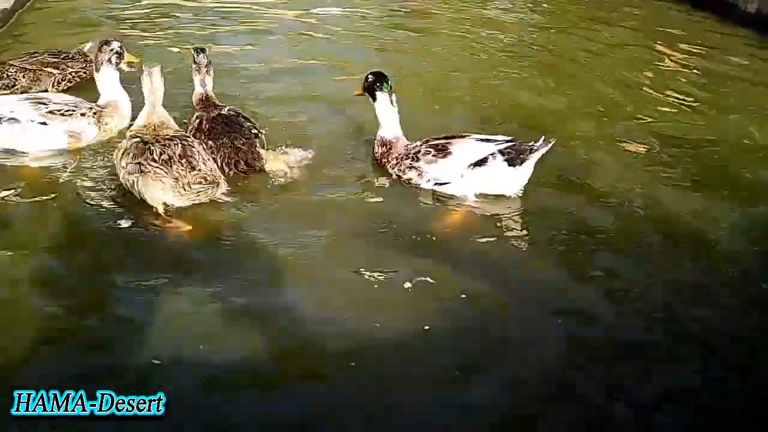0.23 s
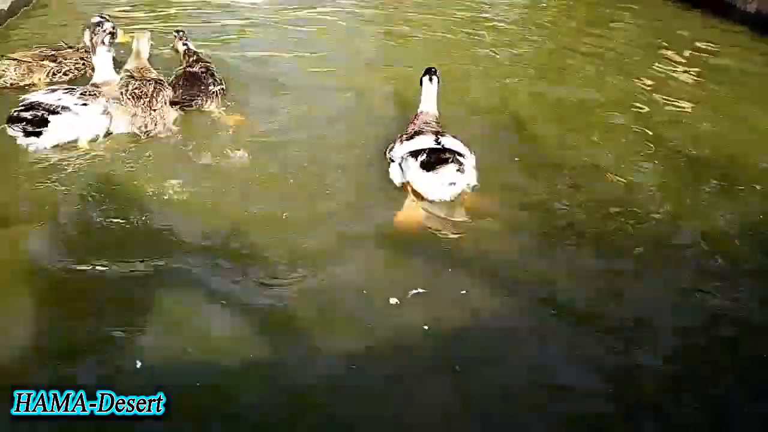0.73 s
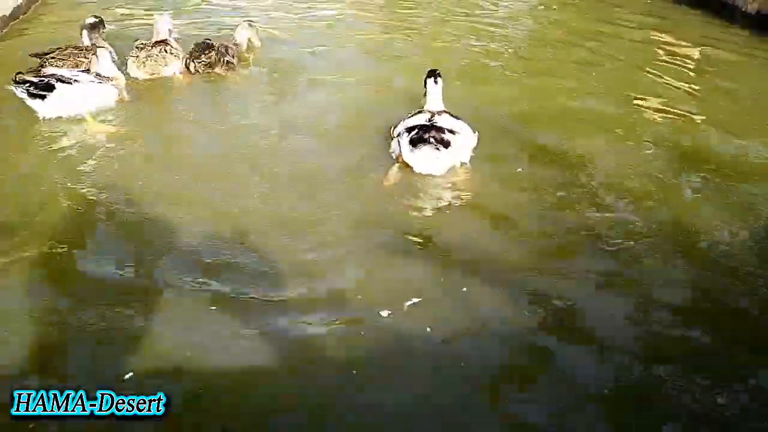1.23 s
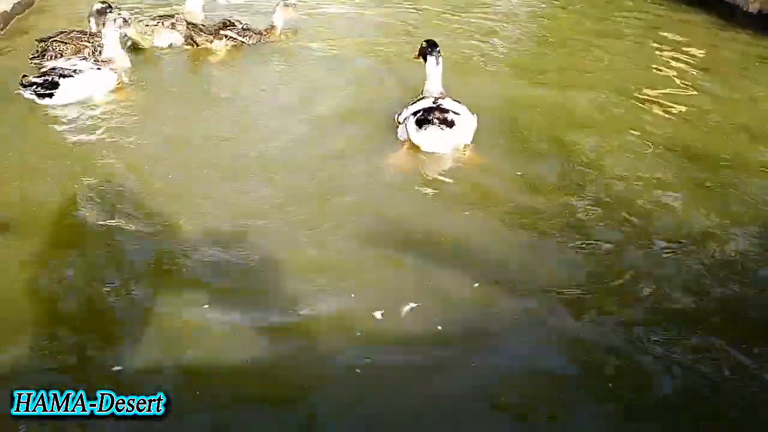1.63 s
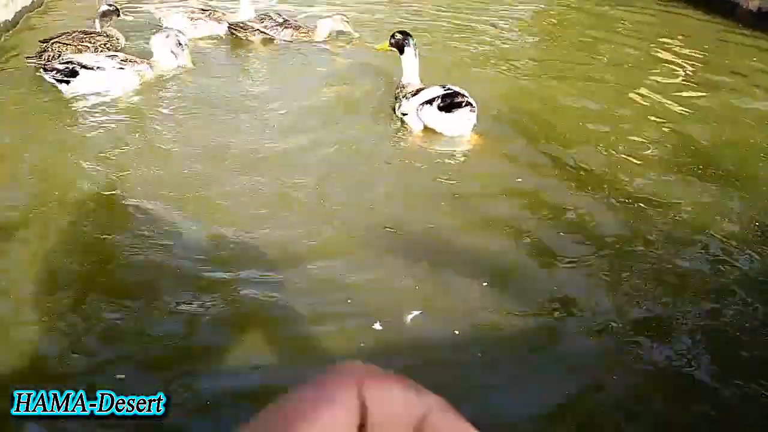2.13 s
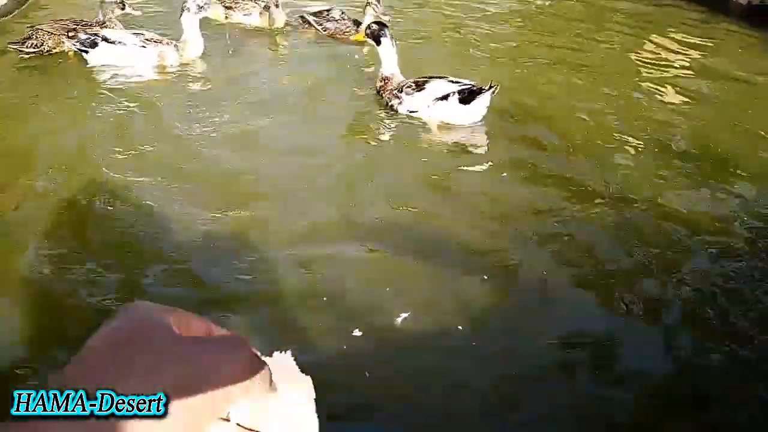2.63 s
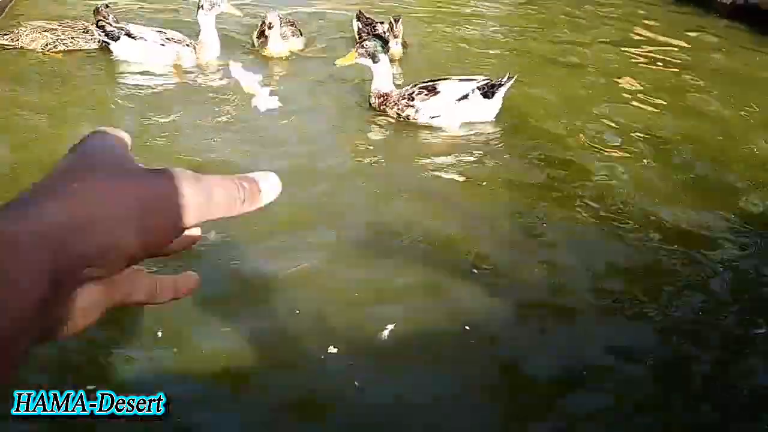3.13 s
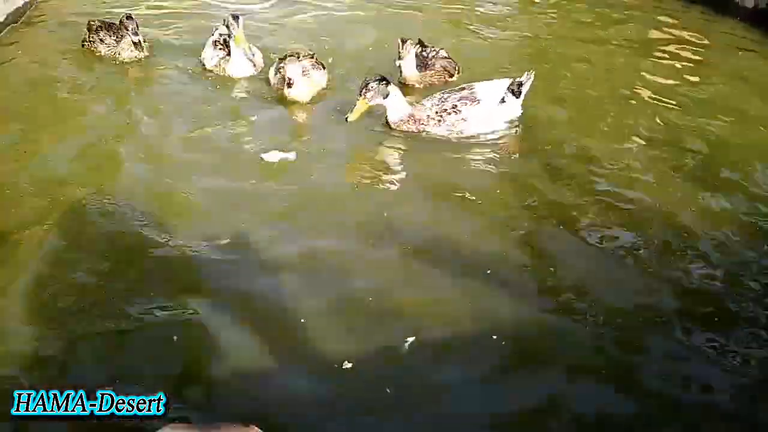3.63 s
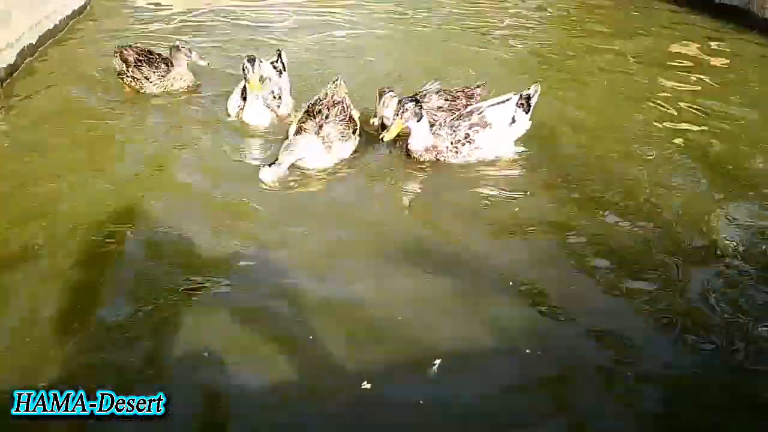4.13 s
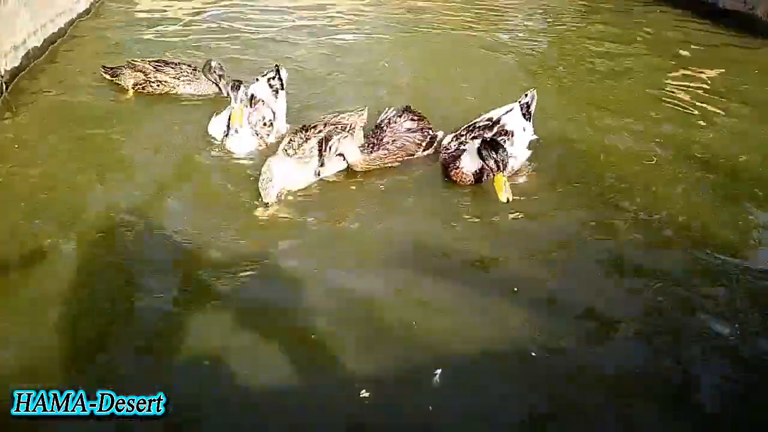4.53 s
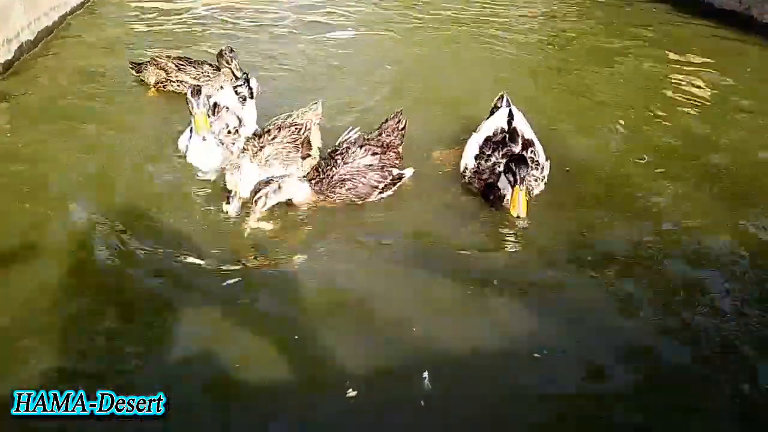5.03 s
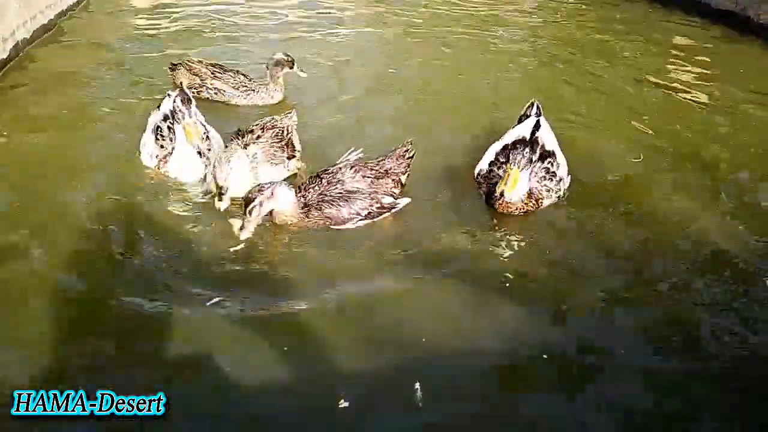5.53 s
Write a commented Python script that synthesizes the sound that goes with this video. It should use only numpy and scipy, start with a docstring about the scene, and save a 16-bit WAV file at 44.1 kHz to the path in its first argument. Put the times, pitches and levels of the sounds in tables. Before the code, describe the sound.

Ducks feed in a shallow outdoor pool. From 0 to about 1.6 s a breeze buffets the microphone hard, with low rumble, thuds and fluttering slaps mostly on the left; around 2 to 2.3 s a weaker gust hits the right, then the wind nearly dies, with only a slight return near 5.4 s. One duck quacks from 0.3 s to 5.6 s: short, hoarse, nasal notes, sparse at first, about four or five a second from 2.4 s, raspier after 3.6 s. A very faint wavering coo sits far off at 2.4-2.9 s. Stirred water makes a fine bubbly hiss, swelling near 0.5, 2.1 and 3.7 s. Crisp drips tick throughout, with a cluster near 2.1 s. Bread plops in at about 3.55 s, followed by small dull plops and denser wet bill clicks until the end. Short reflections surround the pool, which is brighter and louder on the left.

```python
"""Ducks feeding in a shallow pool

A breeze buffets two microphone ports, hard at first, then mostly dying away: shaped noise plus single eddies.
Something coos faintly far off: wavering tones. Stirred water is a fine hiss of noise and many small bubbles.
Bills and feet tick and drip, bread plops in: decaying tones and noise slaps.
One duck gives a long run of short, hoarse quacks: pulses and puffs of noise through resonances."""
import sys
import numpy as np
from scipy import signal
from scipy.fft import rfft, irfft, next_fast_len
from scipy.io import wavfile
from scipy.ndimage import uniform_filter1d

SR = 44100
rng = np.random.default_rng(int(sys.argv[2]) if len(sys.argv) > 2 else 0)


def put_to_file(sound):
    """Save the sound as 16-bit audio at rate SR, in the file named by the first command-line argument."""
    columns = np.atleast_2d(sound).T  # one column per channel
    safe = np.clip(columns, -1, 1)
    whole_steps = np.round(safe * 32767)
    wavfile.write(sys.argv[1], SR, whole_steps.astype(np.int16))


N = 254456
TIME = np.arange(N) / SR


def from_db(db):
    """Decibels to gain."""
    return 10 ** (np.asarray(db) / 20)


def rms_one(x):
    """Scale to unit power."""
    return x / np.sqrt(np.mean(x ** 2) + 1e-20)


def in_time(rows):
    """Interpolate each column of a curve sample by sample."""
    s, *columns = np.transpose(rows)
    return [np.interp(TIME, s, column) for column in columns]


def add(track, s, sound):
    """Mix a sound into a track from time s on."""
    at = int(np.clip(round(s * SR), 0, N - 1))
    track[at:at + len(sound)] += sound[:N - at]


def drift(rate_hz):
    """Smooth random curve with rms 1 and rate_hz knots per second."""
    knots = rng.standard_normal(N // 40)
    return rms_one(np.interp(TIME * rate_hz, np.arange(len(knots)), knots))


def coloured(x, points):
    """Filter by (f/Hz, gain/dB) points, interpolated over log frequency."""
    hz, db = np.transpose(points)
    size = next_fast_len(N + 4096)
    bins_hz = np.maximum(np.fft.rfftfreq(size, 1 / SR), 1)
    gain = from_db(np.interp(np.log(bins_hz), np.log(hz), db))
    return irfft(rfft(x, size) * gain, size)[..., :N]


def resonate(x, hz, width_hz):
    """Resonance with peak gain 1 whose pitch glides along hz while it rings."""
    r = np.exp(-np.pi * width_hz / SR)
    turn = np.exp(2j * np.pi * np.cumsum(hz) / SR)
    return 2 * np.real(turn * signal.lfilter([1 - r], [1, -r], x / turn))


def band(x, low_hz, high_hz):
    """Butterworth band-pass."""
    sos = signal.butter(2, [low_hz, min(high_hz, .45 * SR)], "band", fs=SR, output="sos")
    return signal.sosfilt(sos, x)


def below(x, top_hz):
    """Steep low-pass."""
    return signal.sosfilt(signal.butter(6, min(top_hz, .45 * SR), fs=SR, output="sos"), x)


def pool_walls(x, wet_db, t60_s):
    """Low walls and the yard return short, decaying noise-like reflections, stronger on the right."""
    t, right_db = TIME[:SR // 2], 6.0
    echoes = rng.standard_normal((2, len(t))) * from_db(-60 * t / t60_s) * (t > .002)
    echoes /= np.sqrt(np.sum(echoes ** 2, axis=1, keepdims=True))
    wet = signal.oaconvolve(x[None], echoes, axes=1)[:, :N]
    return x + from_db([[wet_db], [wet_db + right_db]]) * wet


# puffs that thud on a port: [t/s, length/s, level/dB before gain, port 0 left 1 right]
PUFFS = [(-0.015, 0.055, -7, 0), (0.164, 0.062, -10, 0), (0.261, 0.017, -9.5, 0), (0.34, 0.033, -10, 0),
         (0.434, 0.082, -14, 0), (0.49, 0.031, -11, 0), (0.655, 0.068, -15.5, 0), (0.809, 0.078, -16.5, 0),
         (0.918, 0.058, -30, 1), (0.923, 0.041, -21.5, 0), (1.009, 0.092, -20.5, 0), (1.159, 0.039, -20, 0),
         (1.244, 0.041, -16.5, 0), (1.31, 0.047, -21, 0), (1.418, 0.084, -21.5, 0), (1.508, 0.02, -16.5, 0),
         (1.547, 0.027, -12.5, 0), (1.747, 0.067, -22, 0), (2.12, 0.082, -23.5, 0), (2.32, 0.12, -24.5, 0),
         (3.922, 0.045, -36.5, 1), (4.702, 0.045, -30, 1), (4.946, 0.017, -30, 1), (5.003, 0.054, -35, 0),
         (5.146, 0.021, -31, 1)]


def wind_strength(curve, port):
    """Breeze at one port in dB; each puff adds its swelling and fading power."""
    power = from_db(in_time(curve)[0]) ** 2
    for s, length_s, db, side in PUFFS:
        if round(side) == port:
            power = power + from_db(db) ** 2 * np.exp(-(2 * (TIME - s) / length_s) ** 2)
    return 10 * np.log10(power)


def wind(strength_db, gain_db, corner_hz):
    """Turbulence at one port: the harder it blows, the smaller the eddies and the higher the rumble reaches."""
    steep, doubling_db = 8.53, 24.5
    lumpy_db, lowest_hz, highest_hz = 3.0, 70, 1700
    level_db = strength_db + lumpy_db * drift(70)
    # corner_hz holds at -10.5 dB and doubles every doubling_db
    corner = corner_hz * 2 ** ((np.maximum(level_db, -36) + 10.5) / doubling_db)
    edges_hz = 58 * 2 ** (np.arange(11) / 2)
    white, out = rng.standard_normal((2, N)), np.zeros(N)
    for k, (low, high) in enumerate(zip(edges_hz, edges_hz[1:])):
        rolloff = np.sqrt(1 + (np.sqrt(low * high) / corner) ** steep)
        out += band(white[k % 2], low, high) / rolloff
    power = uniform_filter1d(uniform_filter1d(out ** 2, size=1400), size=1400)
    rumble = from_db(level_db + gain_db) * out / np.sqrt(power + 1e-12)
    high_pass = signal.butter(5, lowest_hz, "high", fs=SR, output="sos")
    return signal.sosfilt(high_pass, below(rumble, highest_hz))


# breeze strength at each port: [t/s, level/dB before gain]
WIND_LEFT = [(0.0, -19.5), (0.45, -16), (0.7, -20.5), (1.03, -28), (1.11, -36), (1.42, -26), (1.58, -24),
             (1.66, -42), (1.9, -32), (2.55, -34.5), (2.75, -50.5), (3.55, -56.5), (4.35, -66), (4.9, -54),
             (5.25, -40.5), (5.77, -43.5)]
WIND_RIGHT = [(0.0, -23.5), (0.18, -31.5), (0.55, -28.5), (1.1, -49.5), (1.74, -45), (1.97, -28.5),
              (2.22, -25), (2.5, -42), (3.48, -45.5), (3.62, -79), (4.6, -61), (4.74, -46.5), (5.38, -37.5),
              (5.47, -28.5), (5.64, -34), (5.72, -46)]


def breeze():
    """Wind noise arises at each port on its own, so the two rumbles are unrelated."""
    return np.array([wind(wind_strength(WIND_LEFT, 0), gain_db=1.22, corner_hz=325),
                     wind(wind_strength(WIND_RIGHT, 1), gain_db=4.0, corner_hz=250)])


# single eddies that slap a port: [t/s, level/dB before band-pass, f/Hz at onset, port 0 left 1 right]
EDDIES = [(0.006, -17, 460, 0), (0.016, 5.5, 280, 0), (0.066, -12, 564, 0), (0.135, -3, 620, 0),
          (0.165, 1, 534, 0), (0.173, -1, 340, 0), (0.199, -5, 342, 0), (0.259, -2, 440, 0),
          (0.319, 5, 325, 0), (0.327, 1.5, 344, 0), (0.347, 4.5, 640, 0), (0.363, 0, 627, 0),
          (0.402, -3.5, 560, 0), (0.453, -2.5, 268, 0), (0.482, -2, 570, 0), (0.491, -2.5, 450, 0),
          (0.503, 2, 380, 0), (0.511, -3, 446, 0), (0.600, 2.5, 636, 0), (0.608, -2.5, 370, 0),
          (0.612, -3, 504, 0), (0.638, -0.5, 217, 0), (0.648, -6, 326, 0), (0.718, -2, 274, 0),
          (0.767, -4, 216, 0), (0.786, -9.5, 490, 0), (0.823, -3.5, 358, 0), (0.947, -5, 316, 0),
          (0.999, -5, 325, 0), (1.022, -13.5, 566, 0), (1.045, -6.5, 218, 0), (1.226, 3, 250, 0),
          (1.234, -2, 214, 0), (1.296, -2, 264, 0), (1.534, -7.5, 790, 0), (1.553, -17, 516, 0),
          (1.799, -4, 370, 0), (1.961, -5, 210, 1), (1.974, -4, 250, 1), (2.073, -9, 260, 1),
          (2.098, -7, 280, 1), (2.136, -4.5, 233, 1), (2.221, -4.5, 380, 1), (3.122, -16.5, 188, 1),
          (3.277, -21, 193, 1)]


def eddies():
    """An eddy pushes and pulls the diaphragm once or twice, ever more slowly."""
    cycles, slowing = 0.48, 0.74
    out, t = np.zeros((2, N)), TIME[:2048]
    for s, db, hz, port in EDDIES:
        age = t * hz
        envelope = age / cycles * np.exp(1 - age / cycles)
        swing = -np.sin(2 * np.pi * np.log1p(slowing * age) / slowing) * envelope
        add(out[int(round(port))], s, from_db(db) * swing)
    return band(out, 126, 920)


# faint far-off coos: [t/s, length/s, f/Hz at the top, level/dB, droop at the ends/share, octave/dB]
COOS = [(2.41, .52, 354, -52, 0.35, -1.5)]


def coos():
    """Soft, distant notes arch up and sink again, their pitch wavering into a blur."""
    waver, waver_hz = 0.0704, 140
    out = np.zeros(N)
    for s, length_s, hz, db, droop, octave_db in COOS:
        along = np.linspace(-1, 1, int(length_s * SR))
        pitch_hz = hz * (1 - droop * along ** 2) * (1 + waver * drift(waver_hz)[:len(along)])
        phase = 2 * np.pi * np.cumsum(pitch_hz) / SR
        note = np.sin(phase) + from_db(octave_db) * np.sin(2 * phase)
        add(out, s, from_db(db) * np.cos(np.pi * along / 2) * note)
    return out


def bubble(hz, t60_s, rise=0.53):
    """A bubble's decaying note climbs as it nears the surface."""
    t = TIME[:int(t60_s * SR) + 8]
    note = np.sin(2 * np.pi * hz * (t + rise * t * t / (2 * t60_s)))
    return note * from_db(-60 * t / t60_s) * (1 - np.exp(-2 * hz * t))


def fizz(spectrum, per_s, cycles, spread_db, wash, low_hz, high_hz):
    """Clumps of small bubbles of all sizes over a smooth wash; rms 1."""
    born = rng.random(N) < per_s * from_db(4 * drift(25)) / SR
    strength = from_db(spread_db * np.minimum(rng.exponential(1, N), 4))
    sizes = born * strength * rng.choice([-1, 1], N)
    dealt, grains = rng.integers(0, 24, N), np.zeros(N)
    for k, hz in enumerate(np.geomspace(low_hz, high_hz, 24)):
        grains += hz * signal.oaconvolve(sizes * (dealt == k), bubble(hz, cycles / hz))[:N]
    smooth = rms_one(coloured(rng.standard_normal(N), spectrum))
    return rms_one(rms_one(coloured(grains, spectrum)) + wash * smooth)


# paddling and dabbling: [t/s, stirring level/dB before gain, fine spray level/dB before gain]
WATER = [(0.0, -62.5, -44), (0.2, -54.5, -42), (0.45, -43.5, -40.5), (0.65, -52, -39.5), (0.92, -47.5, -37),
         (1.87, -59.5, -43.5), (2.1, -44.5, -37), (2.45, -55.5, -43), (3.36, -58.5, -48.5),
         (3.66, -49.5, -43.5), (4.0, -56, -43.5), (4.17, -51, -41.5), (4.55, -56.5, -44.5),
         (4.85, -56, -38), (5.08, -60, -42), (5.42, -63.5, -45), (5.65, -50, -45.5), (5.77, -53.5, -39)]
# filter curves of the three textures of stirred water: [f/Hz, gain/dB]
LAPPING = [(200, 4), (350, -5.5), (480, -6), (700, -7), (950, -12), (1500, -2.5), (2200, -20), (3200, -47),
           (9000, -43)]
SPLASH = [(1000, -13), (1800, 7.5), (3000, -3), (4500, -4.5), (6000, -1), (8000, -59), (10000, -45),
          (13000, -23)]
SPRAY = [(2500, -19.5), (4000, -6), (6000, -4.5), (8000, 5), (9500, 1), (11000, -24.5), (14000, -66)]


def water():
    """Feet and bills stir the surface all over the pool, so the ports hear it largely apart."""
    lap_gain_db, splash_gain_db, spray_gain_db = 6.0, 3.0, -4.5
    surge_db, apart = 0.54, .75
    stir_db, spray_db = in_time(WATER)

    def surface():
        """One patch of stirred water: lapping, splashing and spray."""
        lapping = fizz(LAPPING, per_s=400, cycles=19.6, spread_db=6.0, wash=1.0,
                       low_hz=308.6, high_hz=2700)
        splashing = fizz(SPLASH, per_s=560, cycles=84, spread_db=3.0, wash=0.53,
                         low_hz=1746, high_hz=8500)
        spray = fizz(SPRAY, per_s=730, cycles=21.0, spread_db=1.5, wash=0.93,
                     low_hz=5150, high_hz=12300)
        surging_db = spray_db + spray_gain_db + surge_db * drift(16)
        return (from_db(stir_db + lap_gain_db) * lapping
                + from_db(stir_db + splash_gain_db) * splashing
                + from_db(surging_db) * spray)

    return (surface() + apart * surface() * [[1], [-1]]) / np.sqrt(1 + apart ** 2)


def bill_clicks():
    """Faint clicks fall at random while the ducks feed; rows like those of DROPS."""
    count, feeding_s = 20, (3.6, 5.77)
    level_db, spread_db, ring_hz, pitch_spread, body_db = -49, 3.5, 7400, .14, -9
    times = rng.uniform(*feeding_s, count)
    return [(s, level_db + spread_db * size, ring_hz * np.exp(pitch_spread * pitch), body_db)
            for s, (size, pitch) in zip(times, rng.standard_normal((count, 2)))]


# nearest drops and wet bill clicks: [t/s, level/dB before gains, ring f/Hz, body/dB before gain]
DROPS = [(0.284, -39.5, 8600, -9), (0.295, -48.5, 6000, 4), (0.41, -44, 8900, -8),
         (0.443, -35.5, 8950, -17), (0.452, -40.5, 5300, -3.5), (0.559, -46, 7450, -4),
         (0.566, -38.5, 8500, -11.5), (0.638, -42, 9100, -7), (0.904, -45.5, 7600, 0.5),
         (1.0875, -38.5, 8660, -29), (1.1932, -43, 8750, -0.5), (1.294, -39, 8060, -14),
         (1.434, -32, 9630, -41), (1.9928, -38, 7960, -12), (2.0362, -41, 8600, -7),
         (2.091, -30, 7550, -9.5), (2.129, -35, 6320, -3), (2.131, -31.5, 9900, -15),
         (2.2693, -36, 8070, -5.5), (3.5248, -38.5, 8600, -17), (3.5684, -47, 7900, -5),
         (3.714, -41, 8100, -5), (3.806, -41, 9200, -17), (4.0216, -54, 8560, -11),
         (4.035, -46, 10600, -12), (4.046, -40.5, 5330, 6.5), (4.115, -40.5, 8060, -21),
         (4.1657, -38.5, 5660, -11), (4.2155, -42, 8800, -15), (4.4306, -40, 8600, -3.5),
         (4.4488, -40, 7040, -26), (4.6898, -47.5, 5500, 7), (4.746, -39.5, 8840, -5),
         (4.7727, -45, 8400, -5.5), (4.825, -39.5, 8600, -7.5), (4.8336, -32.5, 8800, -29),
         (4.967, -43, 8400, -5), (5.047, -43.5, 5540, -5.5), (5.092, -31, 8200, -17.5),
         (5.247, -40, 8500, -11.5), (5.634, -41, 8600, -15), (5.6544, -44, 7100, -10),
         (5.677, -44, 6400, -2.5)]


def drops():
    """A drop rings a tiny bubble, slaps the surface and scatters droplets; low-ringing ones slap duller."""
    ring_db, ring_s, length_spread = 14.5, 0.00031, .35
    body_db, body_s, wetting_s, slap_top = 14.0, 0.0015, .0005, 1.6
    wet_tail_db, spatter_db, spatter_s = -9.0, -13.0, .014
    droplet_hz, droplet_spread, droplet_ring_s = 7200, .2, 0.00019
    out, t = np.zeros(N), TIME[:2048]

    def tick(hz, peak_s):
        """Short ring that peaks at peak_s."""
        return np.sin(2 * np.pi * hz * t) * (t / peak_s * np.exp(1 - t / peak_s)) ** 1.5

    for s, db, hz, low_db in bill_clicks() + DROPS:
        stretch = np.exp(length_spread * rng.standard_normal())
        wet_tail = from_db(wet_tail_db) * np.exp(-t / (spatter_s * stretch))
        fading = np.exp(-t / (body_s * stretch)) + wet_tail
        noise = band(rng.standard_normal(len(t)), 1600, 12500)
        slap = below(noise * fading * (1 - np.exp(-t / wetting_s)), slap_top * hz)
        ring = from_db(ring_db) * tick(hz, ring_s * stretch)
        add(out, s, from_db(db) * (ring + from_db(low_db + body_db) * slap))
        waits_s = rng.exponential(spatter_s, size=8)
        for wait_s, size in zip(waits_s, rng.standard_normal(size=8)):
            droplet = tick(droplet_hz * np.exp(-droplet_spread * size), droplet_ring_s)
            add(out, s + wait_s, from_db(db + spatter_db + size) * droplet)
    return coloured(out, [(9500, 2.5), (12000, 0.0), (15000, -19)])


# air pockets ringing under the surface: [t/s, level/dB before decay, f/Hz at onset, t60/s, pitch rise over t60/share]
PLOPS = [(0.283, -19.5, 1424, 0.051, 0.47), (0.549, -25, 1193, 0.055, 1), (0.983, -35, 1180, .076, .1),
         (2.463, -31.5, 1273, 0.068, 0.42), (3.543, -40, 414, 0.034, 0.46), (3.563, -19.5, 485, 0.036, 0.7),
         (3.579, -29.5, 600, 0.04, 0.2), (3.595, -28, 640, 0.045, 0.14), (3.688, -15, 826, 0.0056, 0.5),
         (3.98, -7.5, 586, 0.0029, 0.24), (4.015, -32, 1000, 0.051, .4), (4.033, -23.5, 1160, 0.034, 0.55),
         (4.282, -23, 590, 0.01, 0.19), (4.452, -17.5, 1460, 0.0054, 0.88)]


def plops():
    """The bread and the dipping bills trap large bubbles, which ring."""
    out = np.zeros(N)
    for s, db, hz, t60_s, rise in PLOPS:
        add(out, s, from_db(db) * bubble(hz, t60_s, rise))
    return out


def quack(opening_s, closing_s, rasp_db, rasp_lead_s, puffs_per_s, throat, bright):
    """The syrinx snaps shut in a slow beat; snaps and puffs ring the throat, pitched up as the bill opens."""
    puff_s, puff_delay_s, leak, breathy = .0027, .0006, .19, .6
    uneven_db, jitter, hurry = 1.8, .035, .008
    murmur, murmur_s = .38, .006  # soft throat sound before the bill opens
    opening_glide, closing_glide = .24, .09  # share by which the nearly shut bill lowers the resonances
    rasp_gain_db, abruptness = 8.0, 2.3
    lead_s = 1.5 * opening_s
    t = np.arange(int((lead_s + 2.5 * closing_s) * SR)) / SR - lead_s

    def swell(u, power):
        """Rise over the opening, fall over the closing; 1 at u = 0."""
        return np.exp(-abs(u / np.where(u < 0, opening_s, closing_s)) ** power)

    def ring(push, modes, glide):
        """Sum of gliding resonances with alternating signs, in order of frequency."""
        return sum((-1) ** k * from_db(db) * resonate(push, hz * glide, width_hz)
                   for k, (hz, width_hz, db) in enumerate(sorted(modes)))

    # spacing and strength vary from puff to puff; the beat quickens through the call
    chance = rng.standard_normal((25, 2))
    spacing = 1 - hurry * (np.arange(25) - 12) + jitter * chance[:, 0]
    beats_s = np.cumsum(spacing) / puffs_per_s
    snaps, flow = np.zeros((2, len(t)))
    for beat, strength in zip(beats_s - beats_s[12], from_db(uneven_db * chance[:, 1])):
        if t[0] < beat < t[-1]:
            snaps[np.searchsorted(t, beat)] = strength
            flow += strength * np.exp(-((t - beat - puff_delay_s) / puff_s) ** 2)
    puffs = rms_one(rng.standard_normal(SR // 2)[:len(t)] * (flow + leak))

    glide = 1 - np.where(t < 0, opening_glide, closing_glide) * (1 - swell(t, 2.6))
    murmuring = murmur * (t < 0) * (t > -opening_s - murmur_s)
    effort = np.maximum(swell(t, abruptness), murmuring)
    voice = band(ring(effort * (rms_one(snaps) + breathy * puffs), throat, glide), 1080, 2400)
    rasp_effort = swell(t + rasp_lead_s, abruptness) ** 1.5
    rasp = band(ring(rasp_effort * puffs, bright, np.sqrt(glide)), 3000, 9000)
    mix = rms_one(voice) + from_db(rasp_db + rasp_gain_db) * rms_one(rasp)
    return lead_s, mix * np.sqrt(np.mean(effort ** 2))


# quacks: [t/s at the loudest, bill opening/s, closing/s, level/dB before gain, rasp/dB before gain,
#   rasp lead/s, puff rate/Hz, throat f/Hz, bill f/Hz, bill strength/dB before gain, rasp f/Hz];
#   the resonances are those of the open bill
QUACKS = [(0.272, 0.042, 0.043, -38.5, -23, .002, 79, 1464, 1740, 0, 5400),
          (0.859, .032, 0.02, -31, -19, 0.002, 90, 1530, 1820, 4, 5450),
          (1.05, 0.024, 0.032, -37, -18, .003, 90, 1610, 1870, 4, 5400),
          (1.672, 0.031, 0.026, -39, -21, 0.0016, 87, 1440, 1790, -1, 5340),
          (1.919, 0.039, 0.043, -34.5, -19, .002, 94, 1510, 1820, -0.5, 5240),
          (2.390, 0.033, 0.041, -36.5, -19.5, 0.012, 75, 1480, 1834, 3.5, 5150),
          (2.593, 0.039, 0.04, -33, -17.5, 0.0042, 112, 1500, 1870, 4.5, 5350),
          (2.825, .032, 0.02, -32, -20.5, 0.0099, 88, 1482, 1880, 4, 5400),
          (3.029, 0.032, 0.036, -31, -21.5, 0.0036, 85, 1450, 1825, 5.5, 5570),
          (3.230, 0.039, 0.04, -34.5, -16, 0.00091, 97, 1512, 1840, 0.5, 4980),
          (3.454, 0.03, .029, -29, -19.5, .009, 89, 1460, 1756, 8, 5530),
          (3.651, .034, 0.025, -31.5, -9.5, 0.0021, 84, 1580, 1910, 2, 5350),
          (3.734, .044, .036, -33, -25, .003, 81, 1470, 1770, 3, 5460),
          (3.959, 0.037, 0.038, -30, -18.5, 0.0014, 87, 1480, 1766, 5, 5230),
          (4.090, 0.034, 0.02, -29.5, -13, 0.0077, 86, 1505, 1764, 2, 5480),
          (4.302, 0.047, 0.048, -29.5, -12.5, 0.0013, 78, 1490, 1830, 1.5, 5440),
          (4.551, .03, 0.032, -32.5, -15, 0.0037, 92, 1460, 1774, 5.5, 5270),
          (4.713, .028, 0.033, -32.5, -14, 0.0064, 85, 1450, 1770, -2, 5500),
          (4.922, .02, 0.028, -31, -12, 0.0027, 88, 1487, 1830, 2, 5440),
          (5.343, 0.022, 0.032, -31.5, -14.5, 0.0084, 84, 1516, 1780, 3, 5540),
          (5.544, 0.03, .024, -32, -16.5, 0.0059, 88, 1530, 1760, 1.5, 5520),
          (5.610, 0.027, 0.031, -34.5, -18.5, 0.008, 84, 1476, 1700, -3, 5800)]
# resonances common to all quacks, of the throat and of the rasp: [f/Hz at open bill, width/Hz, gain/dB]
THROAT = [(1050, 90, -5), (2280, 140, -3.5), (2850, 260, -3)]
RASP = [(3440, 210, -1.5), (4300, 225, 1.5), (6740, 1200, -7), (7600, 1000, -5.5), (8600, 790, -1)]


def duck():
    """Each quack starts with a dull noise cluck from the nearly shut bill."""
    gain_db, cluck_db, cluck_s, cluck_lead_s = 2.0, -5.5, 0.0062, .011
    low_width_hz, low_db = 53, 3
    bill_width_hz, bill_gain_db = 73, 2
    rasp_width_hz, rasp_peak_db = 340, 7.5
    out, t = np.zeros(N), TIME[:2048]
    for (s, opening_s, closing_s, db, rasp_db, rasp_lead_s, puffs_per_s,
         low_hz, bill_hz, bill_db, rasp_hz) in QUACKS:
        throat = THROAT + [(low_hz, low_width_hz, low_db),
                           (bill_hz, bill_width_hz, bill_gain_db + bill_db)]
        bright = RASP + [(rasp_hz, rasp_width_hz, rasp_peak_db)]
        lead_s, sound = quack(opening_s, closing_s, rasp_db, rasp_lead_s, puffs_per_s, throat, bright)
        add(out, s - lead_s, from_db(db + gain_db) * sound)
        cluck = rms_one(band(rng.standard_normal(len(t)), 480, 1200)) * np.exp(-t / cluck_s)
        add(out, s - opening_s - cluck_lead_s, from_db(db + cluck_db) * cluck)
    return coloured(out, [(9000, 0), (11500, -24)])


# how much weaker the right port hears the pool: [f/Hz, gain/dB]
RIGHT_PORT = [(300, -2), (700, -1.5), (1100, -10.5), (1700, -6.5), (3000, -4), (5500, -6.5), (7500, -2),
              (9000, -25), (12000, -11)]


def scene():
    """The pool reaches the left port later but louder; the wind blows on each port alone."""
    left_lag_s = 0.00016
    distance = pool_walls(coos(), wet_db=1.0, t60_s=0.9)
    drips = pool_walls(drops(), wet_db=-3.0, t60_s=0.062)
    calls = pool_walls(duck() + plops(), wet_db=-8.0, t60_s=.18)
    left, right = distance + water() + drips + calls
    pool = np.array([np.interp(TIME - left_lag_s, TIME, left), coloured(right, RIGHT_PORT)])
    return pool + breeze() + eddies()


def record(dry):
    """Peaks are rounded off towards full scale; the top is cut."""
    cutoff_hz = 15000
    rounded = dry / (1 + dry ** 6) ** (1 / 6)
    return signal.sosfilt(signal.ellip(10, .1, 80, cutoff_hz, fs=SR, output="sos"), rounded)


dry = scene()
out = record(dry)
put_to_file(out)
```